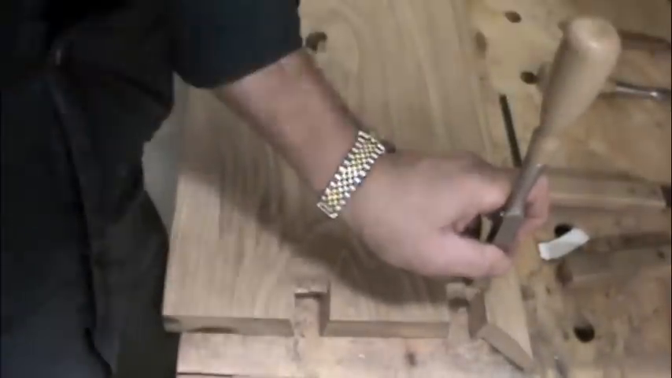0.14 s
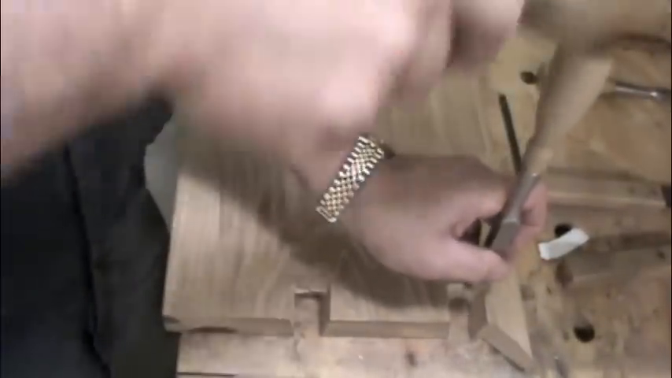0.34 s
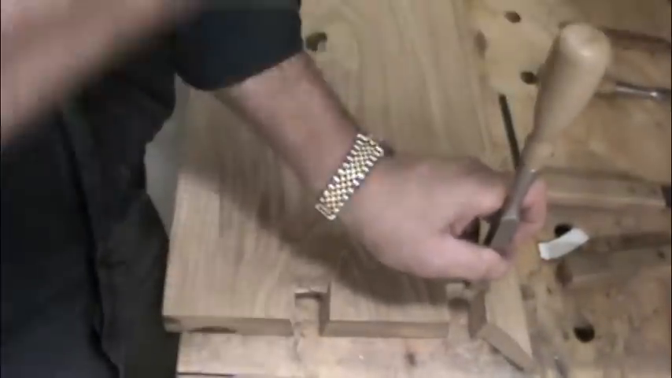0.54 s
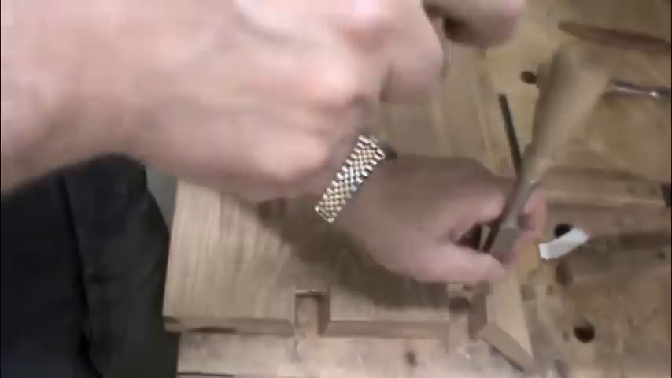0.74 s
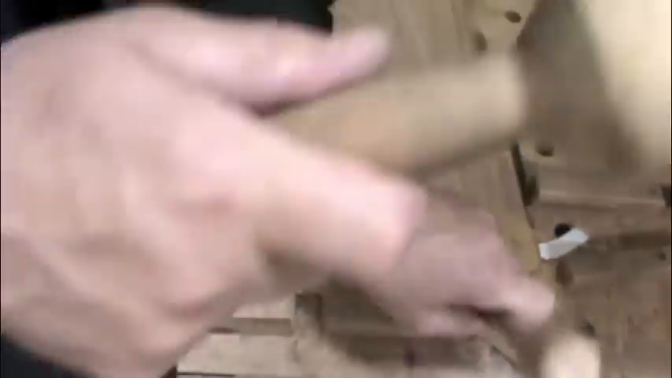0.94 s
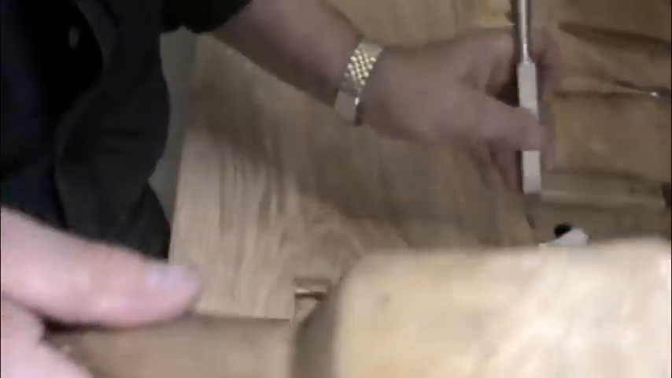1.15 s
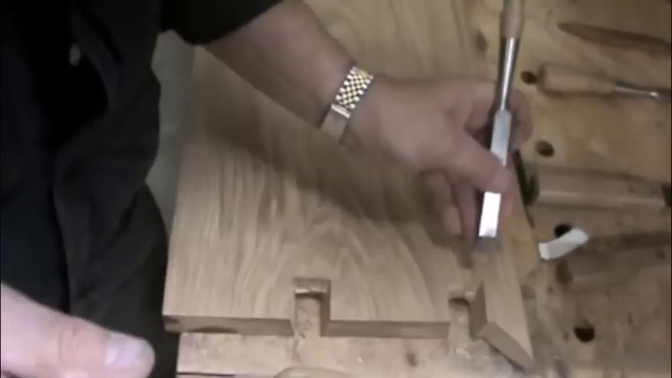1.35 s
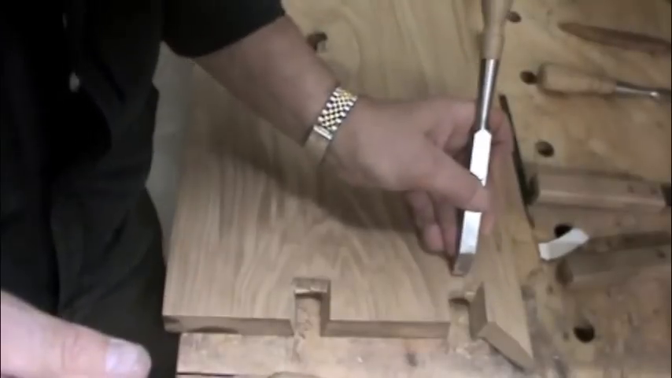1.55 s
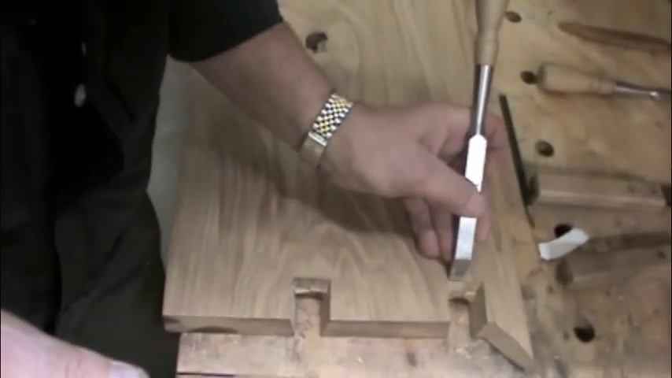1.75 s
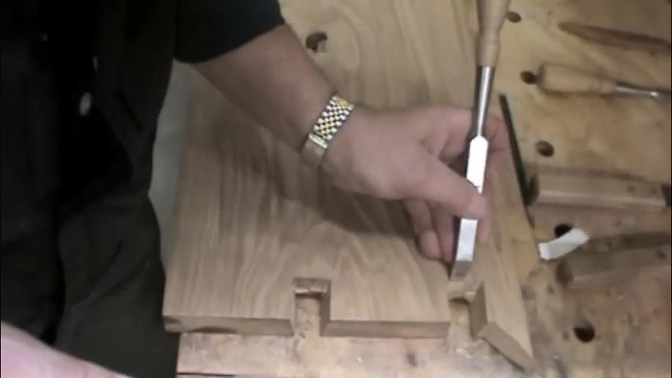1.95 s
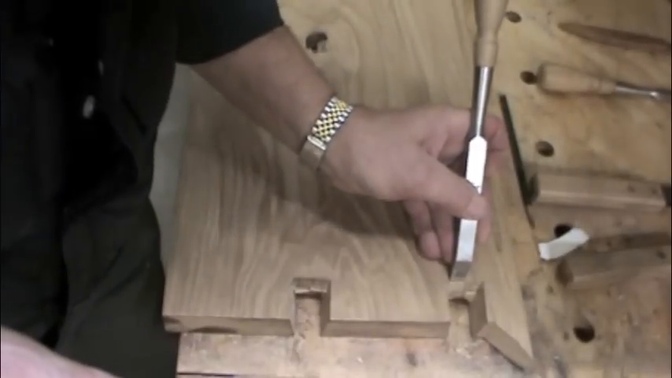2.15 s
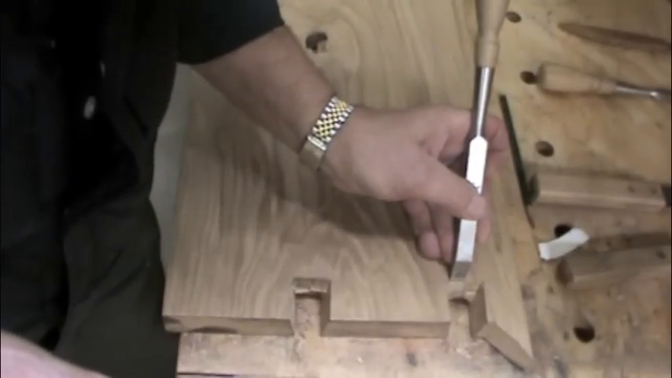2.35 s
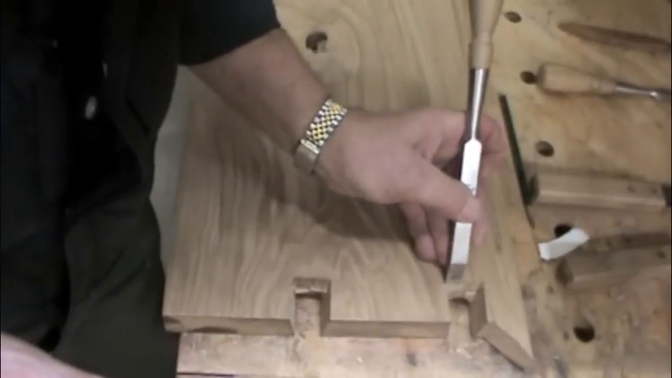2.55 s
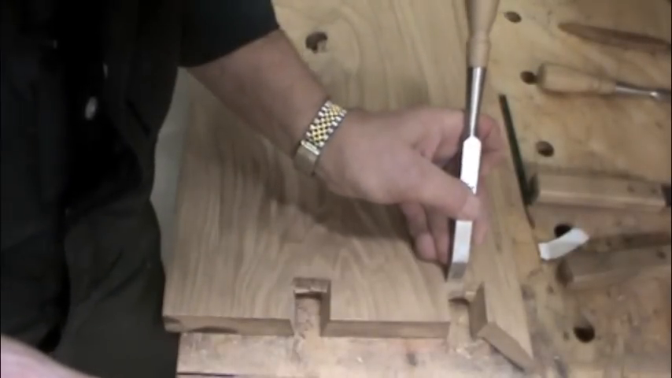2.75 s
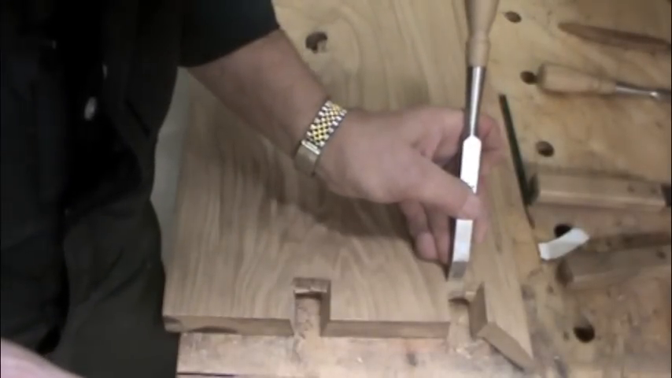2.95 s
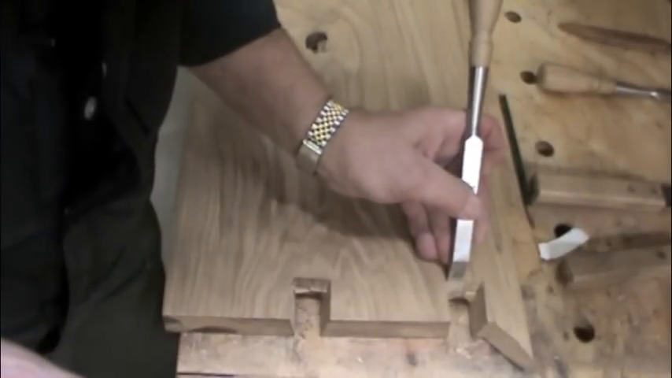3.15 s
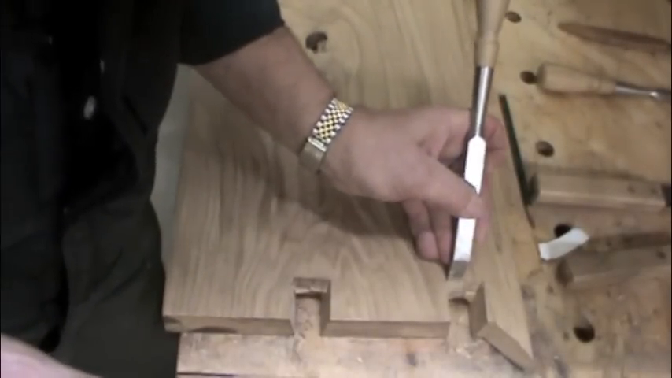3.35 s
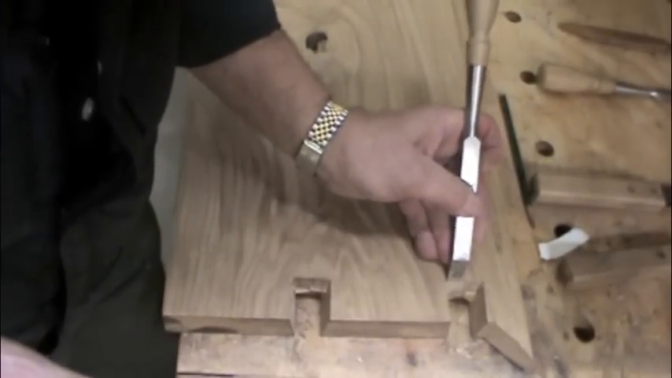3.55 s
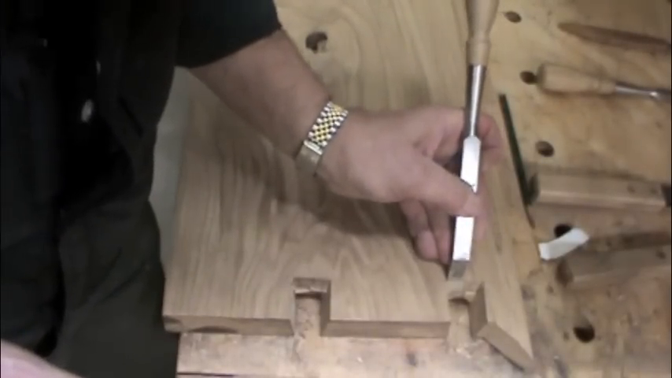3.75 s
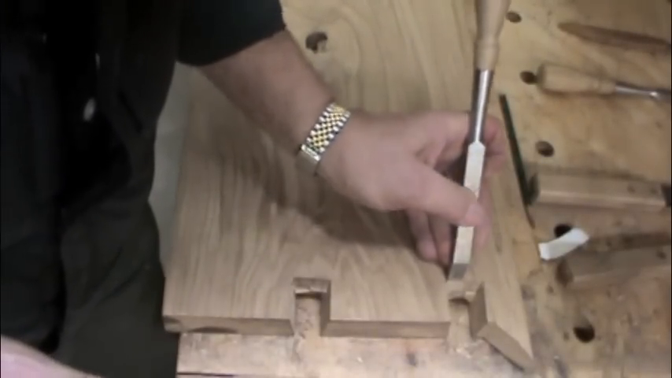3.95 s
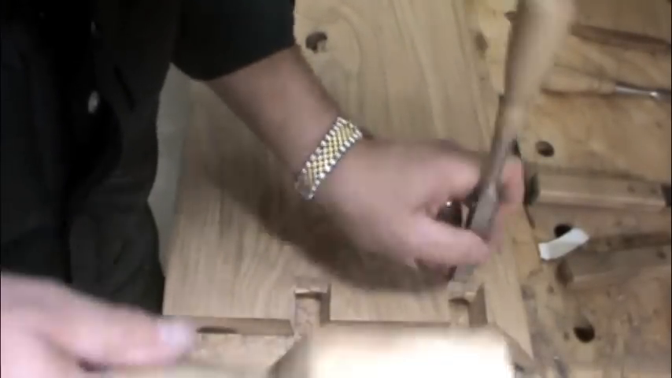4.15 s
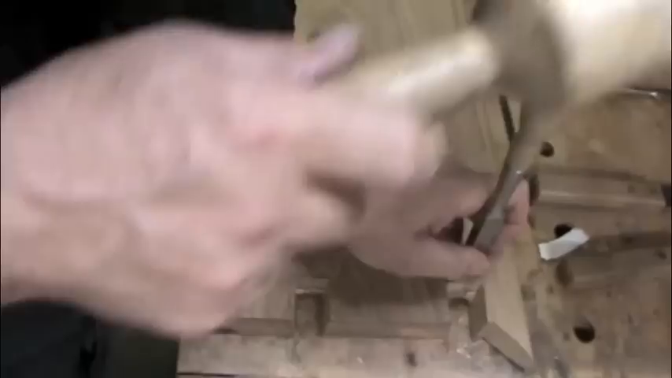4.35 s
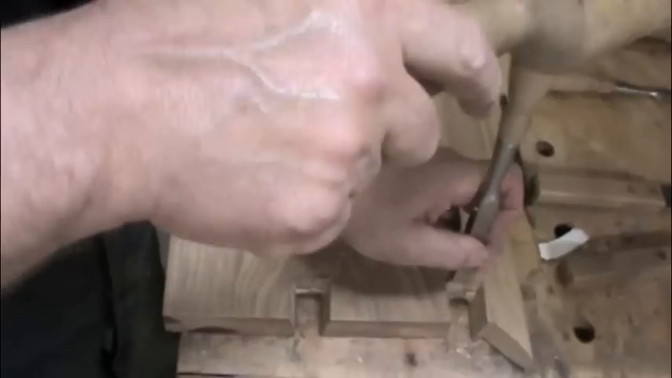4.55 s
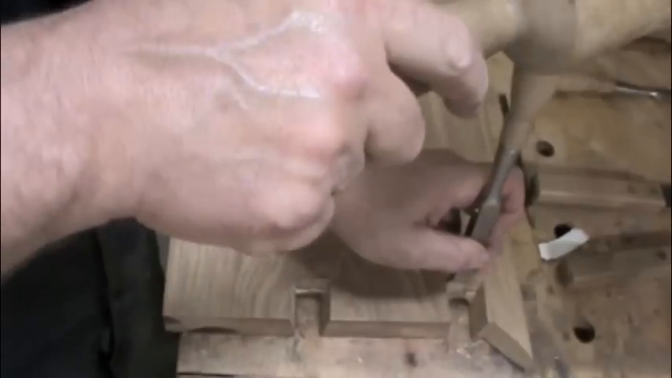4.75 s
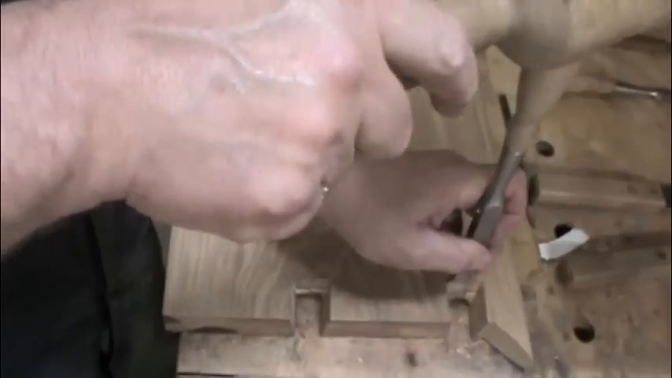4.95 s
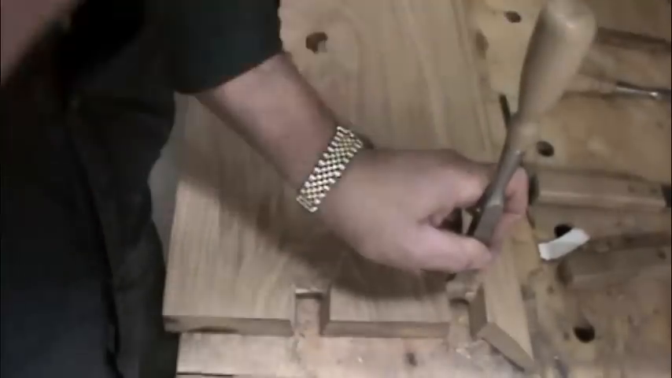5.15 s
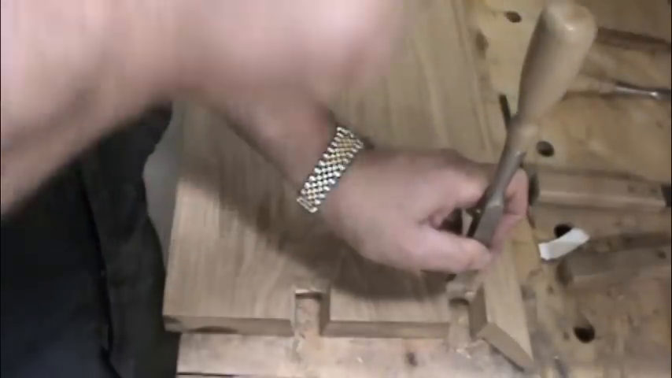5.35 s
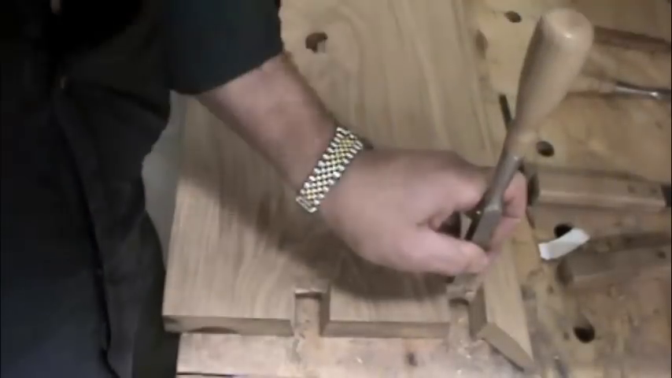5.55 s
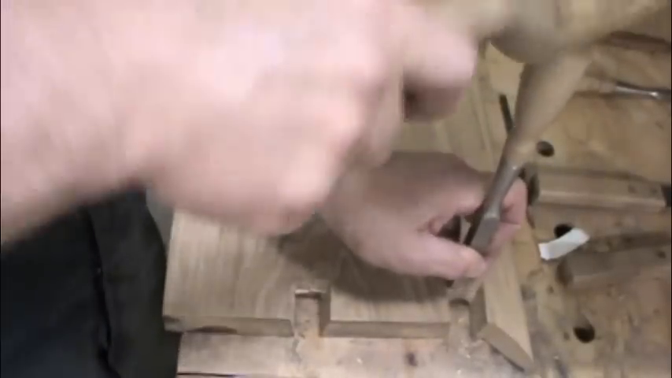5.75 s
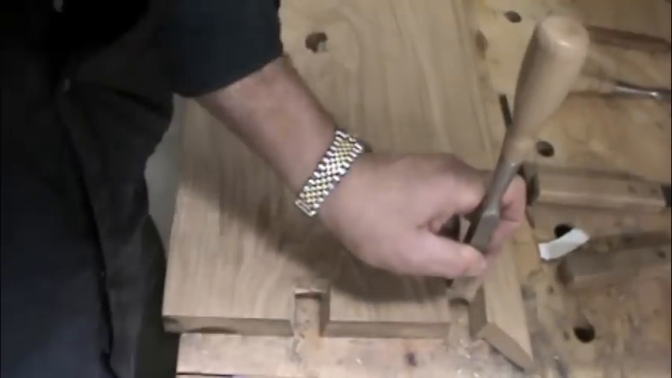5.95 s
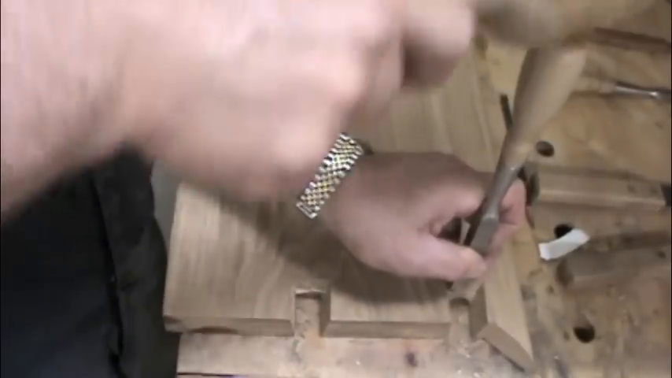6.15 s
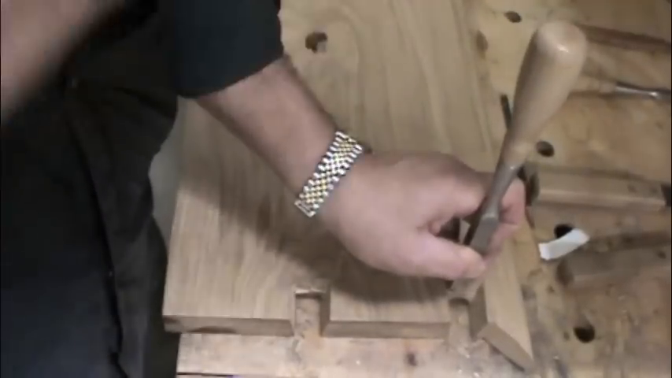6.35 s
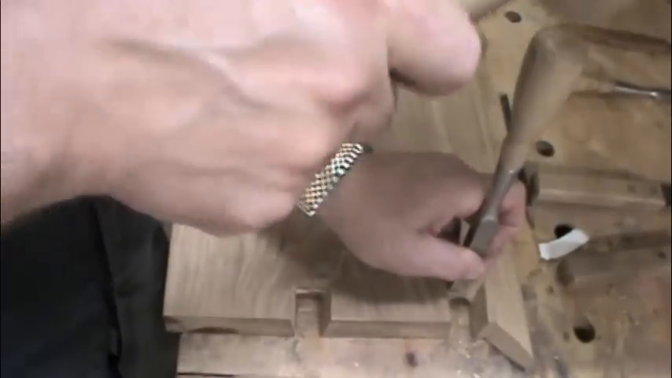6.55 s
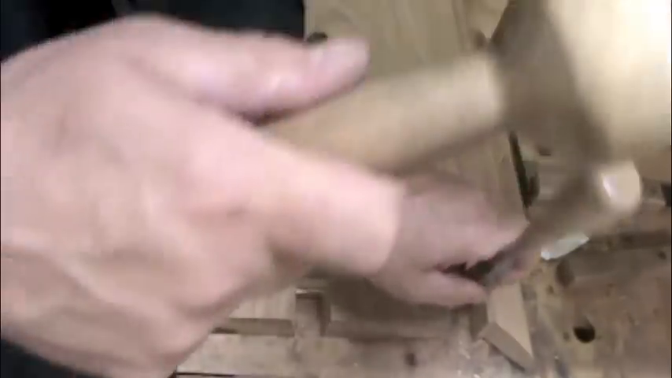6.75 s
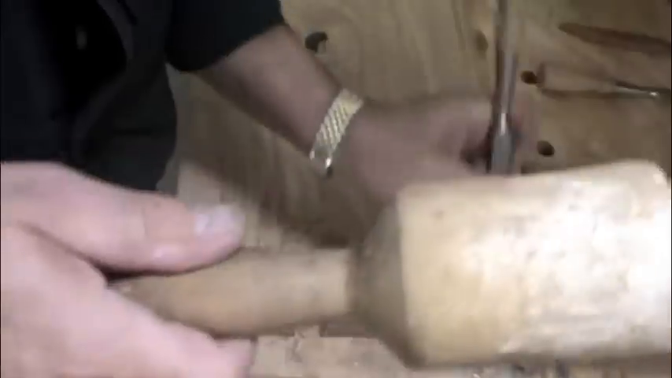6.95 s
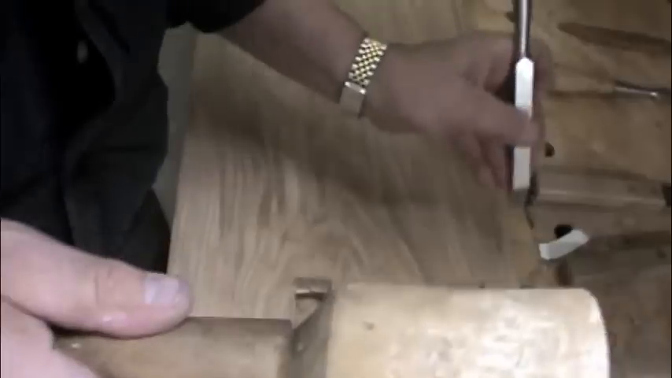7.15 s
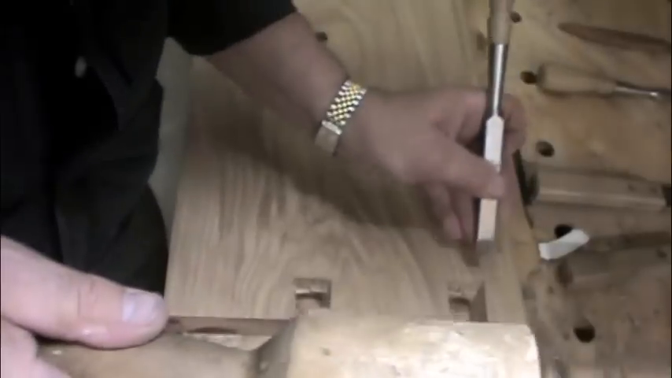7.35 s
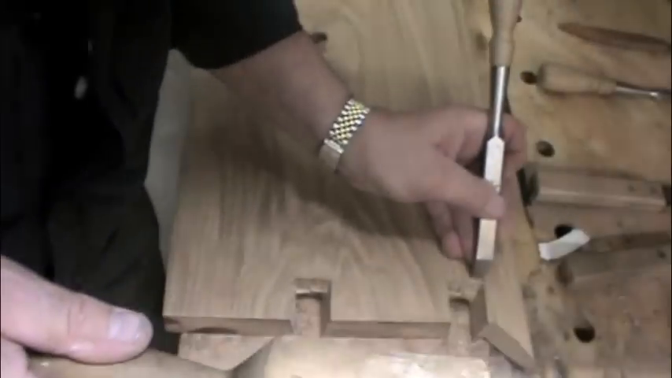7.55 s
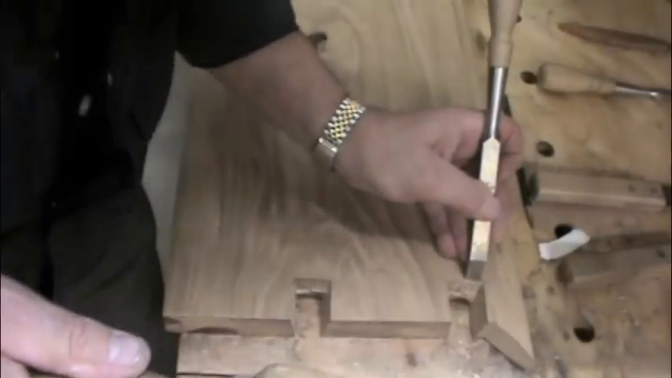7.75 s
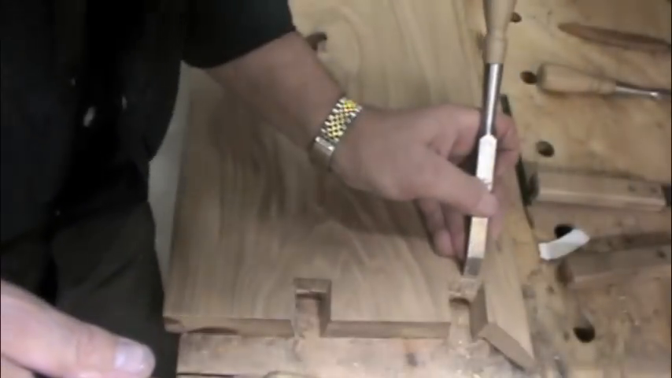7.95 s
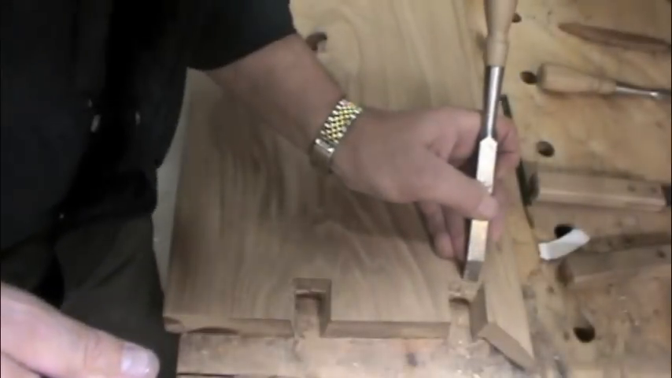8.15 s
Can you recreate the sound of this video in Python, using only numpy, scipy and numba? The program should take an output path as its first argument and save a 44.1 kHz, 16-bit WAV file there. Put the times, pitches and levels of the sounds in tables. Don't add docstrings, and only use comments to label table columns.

```python
import sys
import numpy as np
from scipy import signal
from scipy.fft import rfft, irfft
from scipy.io import wavfile
from scipy.ndimage import map_coordinates
from numba import njit

SR = 44100
rng = np.random.default_rng(int(sys.argv[2]) if len(sys.argv) > 2 else 0)


def field_ratio(decibels):
    return 10 ** (np.asarray(decibels, dtype=float) / 20)


def put_to_file(sound):
    columns = np.atleast_2d(sound).T
    safe = np.clip(columns, -1, 1)
    whole_steps = np.round(safe * 32767)
    wavfile.write(sys.argv[1], SR, whole_steps.astype(np.int16))


N = 361173

# (time [s], contact hardness [Hz], bench thump [dB], crack [dB], blade sizzle [dB])
BLOWS = [
    (-.3, 4900, -9, 0, -1),
    (0.0359, 4880, -6.5, -2, 4.5),
    (0.372, 4740, -4.5, -1, 6),
    (.692, 5200, -2, 2, 2),
    (5.4717, 4600, -4, -5, 9.5),
    (5.8362, 5340, -2.5, -1.5, 5),
    (6.186, 5860, -3, 2.5, 2),
    (6.5208, 5230, -4.5, 2.5, -3.5),
]


def along(points, hz):
    f, v = np.transpose(points)
    return np.interp(np.log(hz + 1), np.log(f + 1), v)


def spectrum(points):
    return lambda hz: field_ratio(along(points, hz))


def resonances(hz, peaks):
    return sum(gain / (1 + (2 * (hz - centre) / width) ** 2) for centre, width, gain in peaks)


def decay(t, t60):
    return field_ratio(-60 * t / t60)


def onset(t, time_constant):
    return 1 - np.exp(-t / time_constant)


def pan(lean_db):
    return field_ratio(lean_db * np.array([[.5], [-.5]]))


def wobble(rate):
    return map_coordinates(rng.standard_normal(int(N * rate / SR) + 4), [np.arange(N) * rate / SR])


def rush(gain, alike, size=N):
    hz = np.fft.rfftfreq(size, 1 / SR)
    turn = np.arccos(np.clip(along(alike, hz), -1, 1)) / 2
    noise = rfft(rng.standard_normal((2, size)))
    mid, side = irfft(noise * gain(hz) * [np.cos(turn), np.sin(turn)], size)
    pair = np.array([mid + side, mid - side])
    return pair / np.sqrt(np.mean(pair ** 2))


def add(track, sound, s):
    at = round(s * SR)
    sound = sound[..., max(-at, 0):N - at]
    track[:, max(at, 0):max(at, 0) + sound.shape[-1]] += sound


def hump(top_s, rise_s, fall_s):
    away = np.arange(N) / SR - top_s
    return away / np.where(away < 0, rise_s, fall_s)


def crack(contact, t60, snap_db):
    # (frequency [Hz], level [dB per Hz])
    wood = [(180, -29), (300, 3.5), (1690, 1.5), (3190, 0), (5080, -9), (7820, -10.5), (11700, -24),
            (15000, -27.5), (16000, -33.5)]
    t = np.arange(SR // 10) / SR
    wood_gain = spectrum(wood)
    colour = lambda hz: wood_gain(hz) * np.sqrt(contact(hz)) * hz ** 2 / (hz ** 2 + 400 ** 2)
    snap = rush(lambda hz: colour(hz) * (hz + 300) ** 0.79, [(1000, 1.0)], size=len(t))
    burst = rush(colour, [(1000, 0.95)], size=len(t))
    sound = field_ratio(snap_db) * decay(t, 0.035) * snap
    sound += decay(t, t60) * onset(t, 0.0034) * burst
    return sound * onset(t, 8 / SR)


def bench():
    # (frequency [Hz], level [dB], t60 [s])
    modes = [(161.6, 0, 0.23), (225, -8, 0.36), (305, 4.5, 0.23), (397, -4, 0.26), (428, 6.5, 0.11),
             (542, -4.5, 0.18), (599, -2.5, 0.22), (678, 3.5, 0.12), (751, -9.5, 0.36), (824, -5.5, 0.19),
             (892, -5, 0.3), (973, -4, .15), (1037, 3.5, 0.088), (1114, -2, 0.2), (1390, -16.5, 0.39),
             (1330, -16, 0.059), (1480, -14.5, 0.13), (1612, -2, 0.16), (1818, -4.5, 0.12), (2170, -21, .1),
             (2230, -14.5, 0.088)]
    t = np.arange(SR // 2) / SR
    out = np.zeros((2, len(t)))
    for hz, level_db, t60 in modes:
        spread_db, detune, phase, side = rng.standard_normal(4)
        swell = onset(t, 8.5 / hz)
        phases = 2 * phase + np.array([[.25], [-.25]]) * side
        ring = np.sin(2 * np.pi * hz * (1 + 0.0078 * detune) * t + phases)
        out += field_ratio(level_db + 2.8 * spread_db) * decay(t, t60) * swell * ring
    return out


def shop(contact):
    # (frequency [Hz], width [Hz], level [dB])
    room_modes = [(159.6, 13, 11.5), (215, 26, 1.5), (286, 29, 7.5), (374, 20, -0.5), (438, 73, 8),
                  (573, 12, 12), (651, 18, 5), (955, 26, 1.5), (1072, 37, 3.5), (1379, 13, 10),
                  (1964, 55, 3), (2346, 110, 3), (3130, 12, 8), (3720, 29, 8), (4560, 59, 4)]
    # (frequency [Hz], level [dB per Hz])
    answer = [(35, -54), (60, -18.5), (91, -21), (155, -9), (186, -11), (418, -2.5), (577, -6), (619, -1.5),
              (1130, -3), (1360, -2.5), (2980, -9.5), (4110, -11.5), (8040, -15), (15000, -28)]
    # (frequency [Hz], t60 [s])
    room_t60 = [(100, 0.73), (300, 0.56), (1000, 0.74), (3000, 0.83), (6000, 0.8), (11000, 0.58)]
    # (frequency [Hz], left-right likeness [0 to 1])
    room_alike = [(60, 0.99), (180, 0.95), (550, 0.71), (1650, 0.82), (4970, 0.93), (15000, 0.79)]
    # (frequency [Hz], left minus right [dB])
    room_lean = [(60, 3), (240, 2.5), (950, 1.5), (3770, -1), (15000, 2.5)]
    answer_gain = spectrum(answer)
    peaks = [(centre, width, field_ratio(db) - 1) for centre, width, db in room_modes]
    noise = rush(lambda hz: answer_gain(hz) * (1 + resonances(hz, peaks)), room_alike, size=SR + SR // 2)
    hz, t, z = signal.stft(noise, SR, nperseg=256)
    colour = pan(along(room_lean, hz)) * contact(hz)
    z = z * colour[..., None] * decay(t, along(room_t60, hz)[:, None])
    tail = signal.istft(z, SR, nperseg=256)[1]
    return tail * onset(np.arange(tail.shape[1]) / SR, 0.03)


def mallet():
    out, blow_db = np.zeros((2, N)), -3
    for s, hard_hz, bench_db, crack_db, sizzle_db in BLOWS:
        def contact(hz):
            sizzle = (field_ratio(sizzle_db) - 1) / (1 + ((hz - 8600) / 700) ** 4)
            return (1 + sizzle) / (1 + (hz / hard_hz) ** 2)

        add(out, field_ratio(blow_db + crack_db + 6) * crack(contact, t60=0.063, snap_db=-6), s)
        add(out, field_ratio(blow_db + bench_db + 5.5) * pan(1.8) * bench(), s)
        add(out, field_ratio(blow_db + 4.0) * shop(contact), s)
    return out


def background(points):
    # (frequency [Hz], left-right likeness [0 to 1])
    air_alike = [(60, 1.0), (180, 1.0), (550, 0.86), (1650, 0.53), (4970, 0.57), (15000, 0.96)]
    return rush(spectrum(points), air_alike)


def engine(near_db):
    # (multiple of the shaft [ratio], level [dB], unsteadiness [dB])
    orders = [(2, -3, 1.5), (3, 0, 2.5), (4, 1.5, 0.5)]
    t = np.arange(N) / SR
    shaft_hz, slows_hz_per_s = 50, 1.7
    turns = np.cumsum(shaft_hz - slows_hz_per_s * (t - 1.5) + 1.1 * wobble(7)) / SR
    load_db = 15 * np.exp(-hump(top_s=3.63, rise_s=0.83, fall_s=0.59) ** 2)
    drone = np.zeros(N)
    for k, db, loose_db in orders:
        level_db = db + loose_db * wobble(5.2) + (k == 2) * load_db
        drone += field_ratio(level_db) * np.sin(2 * np.pi * k * turns)
    return field_ratio(-57 + 1.4 * (near_db + 52.5)) * drone


def vehicle():
    # (time [s], nearness [dB])
    traffic = [
        (1.5, -55),
        (2.3, -54),
        (3.5, -52),
        (4.2, -49.5),
        (4.55, -47),
        (5.4, -48),
        (6.6, -57),
        (7.35, -57.5),
        (8.19, -59),
    ]
    # (frequency [Hz], level [dB per Hz])
    rumble = [(90, -35.5), (125, -1.5), (150, -0.5), (190, 5), (230, -7.5), (300, -20.5), (400, -41.5)]
    # (frequency [Hz], level [dB per Hz])
    road = [(150, -24.5), (260, -2), (350, -6), (408, -8), (500, -8.5), (810, -3.5), (1560, -14.5),
            (1930, -26), (3000, -30), (3900, -62), (6600, -120)]
    # (frequency [Hz], level [dB per Hz])
    deep = [(8.8, -67.5), (15, -42), (27, -19.5), (48, -3), (91, -14), (130, -3.5), (170, -27), (290, -120)]
    s, db = np.transpose(traffic)
    near_db = np.interp(np.arange(N) / SR, s, db)
    rumble_db = -54 + 1.7 * (near_db + 53.5)
    low = engine(near_db) + field_ratio(rumble_db + 0.52 * wobble(2.9)) * background(rumble)
    low += field_ratio(-59.0 + 0.53 * (rumble_db + 57.5)) * background(deep)
    return low * pan(2.4) + field_ratio(near_db + 1.06 + 0.99 * wobble(2.9)) * background(road)


def hiss():
    # (frequency [Hz], level [dB per Hz])
    hiss_colour = [(880, -41), (1500, -15.5), (1780, -5), (1930, 1), (2030, -11), (2330, -5), (2820, -12.5),
                   (3480, -10.5), (4570, -12), (5810, -12), (10700, -14), (15100, -18), (15800, -17),
                   (16000, -61)]
    hiss_db, recover_db_per_s = -63, 1.68
    t = np.arange(N) / SR
    struck = np.array([row[0] for row in BLOWS])
    since = t - struck[np.searchsorted(struck, t) - 1]
    return field_ratio(hiss_db + recover_db_per_s * since) * background(hiss_colour)


def sleeve():
    # (fastest moment [s], rise [s], fall [s], rustle [dB])
    movements = [
        (1.15, 0.082, 0.39, -57),
        (4.36, .2, 0.32, -42),
        (4.9, 0.36, 0.17, -60.5),
        (5.21, .2, 0.22, -48),
        (5.44, 0.086, .1, -44.5),
        (6.9, 0.084, .4, -53),
        (7.5, 0.3, .3, -64),
    ]
    # (frequency [Hz], level [dB per Hz])
    cloth = [(290, -41), (500, 2), (578, -12), (631, -6), (843, -1), (1300, -2.5), (1510, -1), (2130, -3),
             (3980, -0.5), (5630, -6.5), (8700, -2), (9920, -7), (15100, -17.5), (16000, -21)]
    edge_db = 25
    grain = field_ratio(0.58 * wobble(25) + 0.71 * wobble(240))
    friction = rush(spectrum(cloth), [(1000, 0.87), (8000, 0.68)]) * grain
    speed = sum(field_ratio(db + 6.0 - edge_db * np.abs(hump(s, rise_s, fall_s)) ** 2.6)
                for s, rise_s, fall_s, db in movements)
    return friction * speed


def ticks():
    # (time [s], peak [dB], centre [Hz], left minus right [dB])
    hard_ticks = [(1.2256, -32.5, 8640, 11), (1.5209, -36, 8100, 1), (1.7977, -35, 10970, -7),
                  (3.8501, -36.5, 7350, 2), (4.0003, -38, 7300, 0.0), (6.815, -13, 7500, -4),
                  (6.9442, -19.5, 7830, 4), (7.076, -9.5, 9510, 2.5), (7.1716, -33, 10100, 6.5),
                  (7.2355, -34, 8920, 2.5), (7.4076, -45.5, 8610, 0), (7.433, -49, 8700, -0.5),
                  (7.5822, -36.5, 10500, 4.5)]
    # (time [s], peak [dB], centre [Hz], left minus right [dB])
    snags = [
        (4.2404, -24, 3840, 2.0),
        (4.3684, -29, 4090, 4.0),
        (5.3388, -30.5, 4060, 0.5),
    ]
    out, t = np.zeros((2, N)), np.arange(2048) / SR
    fade = (decay(t, 0.008) + 0.018 * decay(t, .06)) * onset(t, 0.00037)
    for table, width, trim_db in ((hard_ticks, .55, -6), (snags, .08, -.5)):
        for s, db, centre_hz, lean_db in table:
            band = lambda hz: 1 / (1 + ((hz - centre_hz) / (width * centre_hz)) ** 2) ** 2
            click = rush(band, [(1000, 0.97)], size=len(t))
            add(out, click * field_ratio(db + trim_db) * pan(lean_db) * fade, s)
    return out


def taps():
    # (time [s], level [dB], brightness [dB per octave])
    set_downs = [
        (2.885, -51, -14),
        (3.673, -29, -2),
        (3.95, -20, 0.5),
    ]
    # (frequency [Hz], level [dB], t60 [s])
    board = [(165, -7, 0.14), (220.6, -13, 0.35), (313, -2.5, 0.2), (372, -3.5, 0.16), (415, -1, 0.073),
             (510, -7, 0.072), (638, -11, 0.14), (710, -4, 0.048), (820, -8, 0.045), (924, -3, 0.032),
             (1104, -21, 0.042), (2310, -18.5, 0.033)]
    out, t = np.zeros((2, N)), np.arange(SR // 4) / SR
    for s, db, tilt_db in set_downs:
        thud = np.zeros(len(t))
        for hz, level_db, t60 in board:
            mode = np.sin(2 * np.pi * hz * t + rng.normal(0, 1.2))
            thud += field_ratio(level_db + tilt_db * np.log2(hz / 350)) * decay(t, t60) * mode
        snap = crack(lambda hz: 1 / (1 + (hz / 900) ** 4), t60=0.026, snap_db=-12)
        add(out, field_ratio(db) * pan(2.2) * thud * onset(t, 0.0035), s)
        add(out, field_ratio(db - 14 + 4 * tilt_db) * snap, s)
        add(out, field_ratio(db - 12) * shop(lambda hz: 1 / (1 + (hz / 700) ** 3)), s)
    return out


def hollow_bench():
    # (frequency [Hz], level [dB], t60 [s], beat [Hz])
    pairs = [(163.2, -16, 0.54, 7.6), (222, -2.5, 0.38, 5.1), (267, -8, 0.3, 6.7), (321, -10, 0.39, 5.4),
             (380.8, -2, 0.27, 8.5), (526, -12.5, 0.34, 16), (635, -13.5, 0.53, 7.4),
             (752, -13.5, 0.46, 17.7), (825, -11.5, 0.41, 36), (895, -11.5, 0.28, 20),
             (1077, -9.5, 0.24, 87), (1196, -35.5, 0.39, 29), (1210, -17, 0.25, 8.1), (1530, -23, 0.21, 57)]
    deep_db = 4
    t = np.arange(SR // 2) / SR
    body = np.zeros((2, len(t)))
    for hz, level_db, t60, beat_hz in pairs:
        spread_db, detune, side = rng.standard_normal(3)
        beat = hz / 1400 + np.sin(2 * np.pi * beat_hz * t)
        phases = np.array([[.25], [-.25]]) * side
        ring = np.sin(2 * np.pi * hz * (1 + 0.0061 * detune) * t + phases)
        swell = onset(t, 3.6 / hz / (1 + (hz / 500) ** 3))
        body += field_ratio(level_db + deep_db * (hz < 260) + .8 * spread_db) * decay(t, t60) * swell * beat * ring
    return body


def chatter(track, s, db):
    # (frequency [Hz], width [Hz], level [dB])
    blade = [(2760, 200, 6), (3580, 190, 1.5), (4710, 110, -3), (5500, 270, -16), (6200, 300, -8),
             (7250, 400, -13)]
    first_gap_s, gap_grows, loss_db = 0.014, 1.1, 4
    t, k = np.arange(SR // 2) / SR, np.arange(5)
    contacts = s + first_gap_s * np.cumsum(gap_grows ** k)
    for contact_s, contact_db in zip(contacts, db - loss_db * k):
        peaks = [(centre, width, field_ratio(level_db + rng.normal(0, 2.8))) for centre, width, level_db in blade]
        steel = rush(lambda hz: resonances(hz, peaks), [(1000, 0.92)], size=len(t))
        add(track, field_ratio(contact_db - 2.0) * decay(t, 0.13) * onset(t, 0.001) * steel, contact_s)


def knocks():
    # (time [s], strength [dB], room [dB], tick [dB], chatter [dB])
    seating = [
        (4.645, -6, 2.5, 0, -26),
        (5.001, -8.5, -0.5, 5.5, -33.5),
    ]
    soft_hz, legs_hz = 1440, 92
    out, t = np.zeros((2, N)), np.arange(SR // 2) / SR
    for s, db, room_db, tick_db, chatter_db in seating:
        snap = crack(lambda hz: 1 / (1 + (hz / 2500) ** 2), t60=.03, snap_db=-11.0)
        tick = decay(t, .012) * rush(lambda hz: hz > 3000, [(1000, 1.0)], size=len(t))
        legs = decay(t, 0.33) * np.sin(2 * np.pi * legs_hz * t) * np.ones((2, 1))
        add(out, field_ratio(db + 1.0) * pan(2.8) * hollow_bench(), s)
        add(out, field_ratio(db + tick_db - 14) * snap, s)
        add(out, field_ratio(db + tick_db - 28) * tick, s)
        add(out, field_ratio(db - 21.5) * legs, s)
        add(out, field_ratio(db + room_db - 10.5) * shop(lambda hz: 1 / (1 + (hz / soft_hz) ** 4)), s)
        chatter(out, s, chatter_db)
    return out


def scene():
    return mallet() + vehicle() + hiss() + sleeve() + ticks() + taps() + knocks()


@njit
def follow(level, rise, fall):
    out, held = np.empty_like(level), 0.0
    for i in range(len(level)):
        held += (level[i] - held) * (rise if level[i] > held else fall)
        out[i] = held
    return out


def roll_off(x):
    return signal.sosfilt(signal.butter(12, 15900, fs=SR, output="sos"), x)


def record(dry):
    level = follow(np.abs(dry).max(axis=0), 1 / (SR * 0.00071), 1 / (SR * 0.044))
    held = dry / (1 + (level / field_ratio(-5)) ** 3) ** (1 / 3)
    held = held / (1 + np.abs(held / .82) ** 4) ** (1 / 4)
    held = signal.sosfilt(signal.butter(1, 40, "high", fs=SR, output="sos"), held)
    return roll_off(held)


dry = scene()
out = record(dry)
put_to_file(out)
```